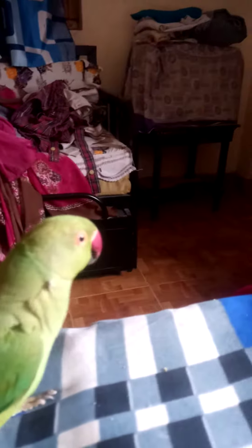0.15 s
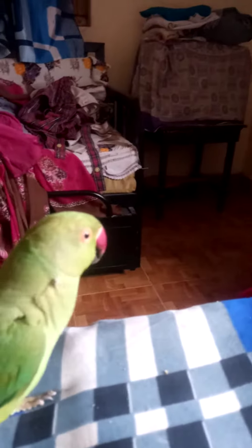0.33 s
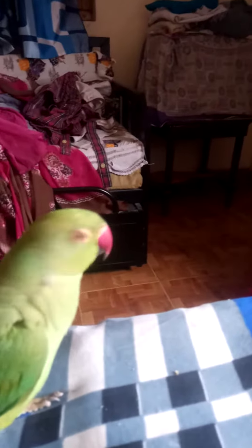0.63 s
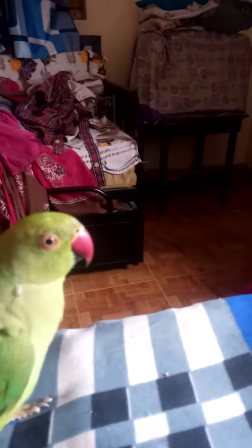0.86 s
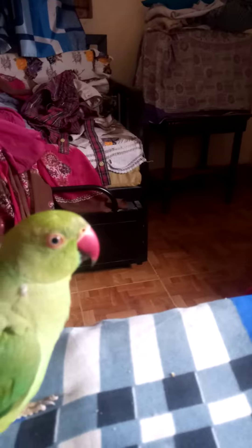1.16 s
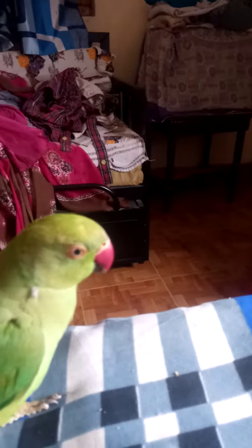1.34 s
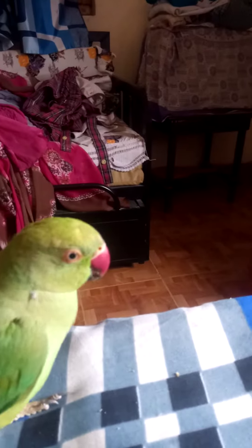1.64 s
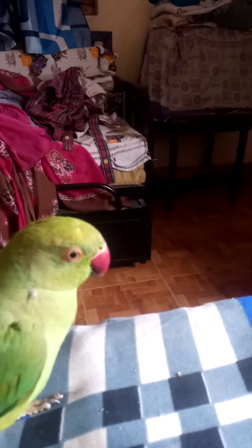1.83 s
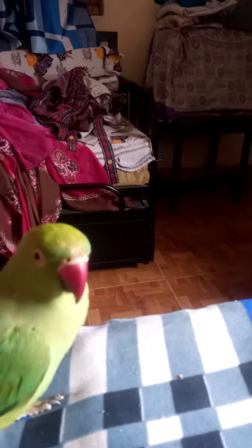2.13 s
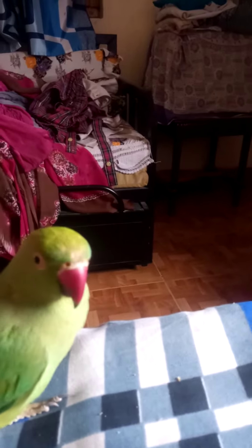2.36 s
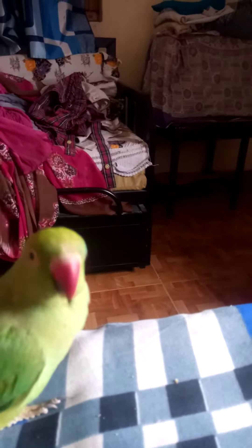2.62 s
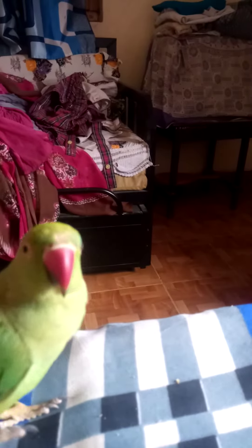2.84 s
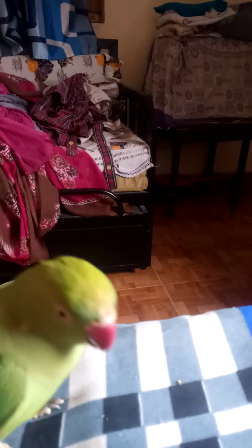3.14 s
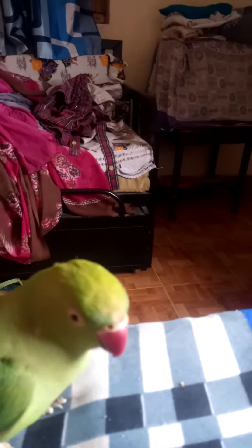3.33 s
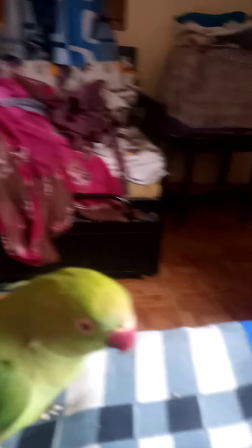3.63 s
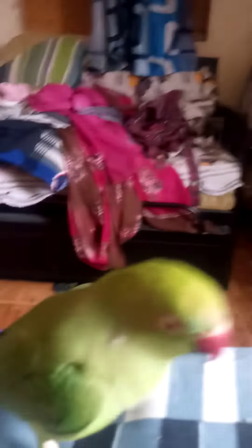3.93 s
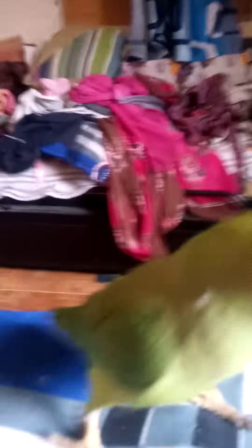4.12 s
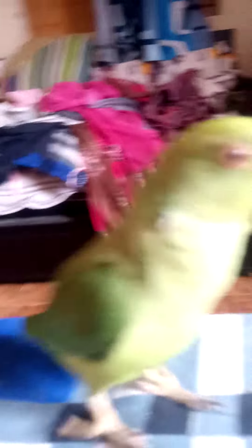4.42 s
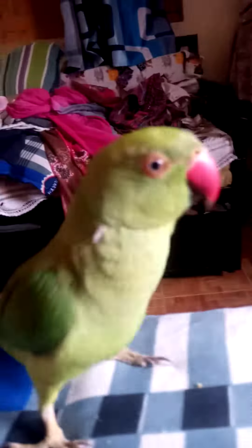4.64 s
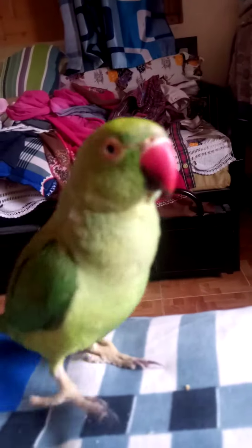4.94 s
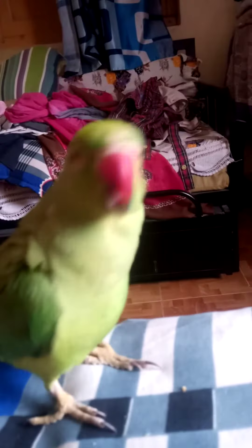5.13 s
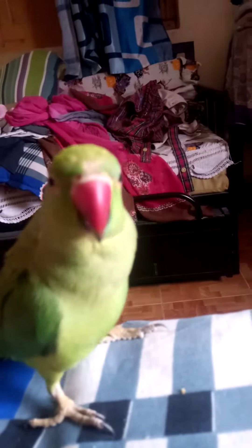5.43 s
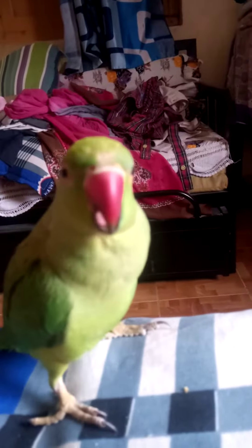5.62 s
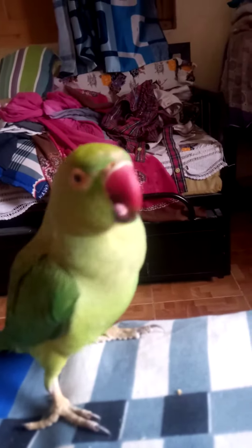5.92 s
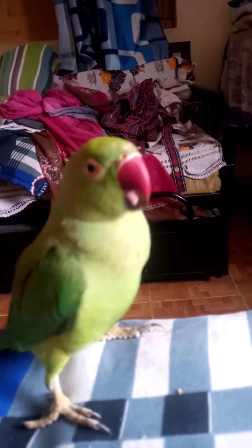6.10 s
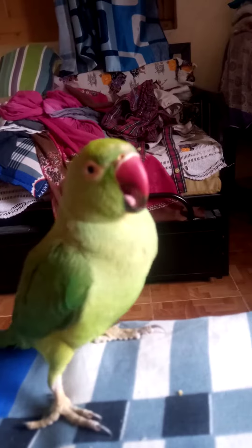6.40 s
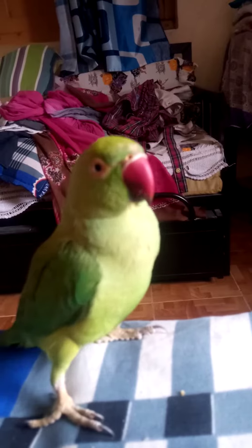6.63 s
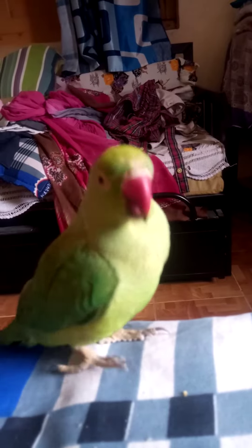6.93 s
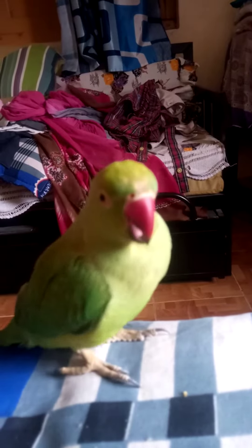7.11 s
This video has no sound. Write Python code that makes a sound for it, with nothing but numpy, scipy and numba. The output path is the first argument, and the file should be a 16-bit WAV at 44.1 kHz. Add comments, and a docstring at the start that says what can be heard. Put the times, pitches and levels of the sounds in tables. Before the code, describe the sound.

A faint fan hums in a small room while a parakeet, close to the phone's microphone, lets out eight brief, shrill screeches. Each starts as a rising buzz, becomes a whistle and drops away, leaving a short ring off the walls. The first three are separated by pauses; the last five come closer together. The hand holding the phone rumbles and bumps softly underneath.

```python
"""A faint fan hums in a small furnished room; close to a hand-held phone, a parakeet screeches eight times.
Each screech comes from a membrane in the syrinx, coloured by windpipe, throat and beak, and takes three
registers in quick succession: a rising buzz that cracks upward, a piercing whistle, and a drop of about
a fifth that slides away. The first screech has a short gap after its buzz. The room rings after each
and the phone's gain control ducks. Underneath, the hand on the phone rumbles and bumps softly."""
import sys
import numpy as np
from scipy import signal
from scipy.fft import rfft, irfft
from scipy.io import wavfile
from scipy.ndimage import map_coordinates
from numba import njit

SR = 44100
rng = np.random.default_rng(int(sys.argv[2]) if len(sys.argv) > 2 else 0)


def to_wav(s):
    """Save 16-bit WAV."""
    ch = np.atleast_2d(s).T  # columns
    pcm = np.round(np.clip(ch, -1, 1) * 32767)  # PCM
    wavfile.write(sys.argv[1], SR, pcm.astype(np.int16))


N = 320166
TIME = np.arange(N) / SR


def undb(db):
    """Decibels to gain."""
    return 10 ** (np.asarray(db) / 20)


def lookup(hz, points):
    """Read (frequency, value) points along a log axis."""
    f, value = np.transpose(points)
    return np.interp(np.log(np.maximum(hz, 1)), np.log(f), value)


def shaped(x, gain):
    """Filter by a gain that is a function of frequency."""
    return irfft(rfft(x) * gain(np.fft.rfftfreq(len(x), 1 / SR)), len(x))


def unit(x):
    """Scale to rms 1."""
    return x / np.sqrt(np.mean(x ** 2))


def wander(size, rate):
    """Smooth random drift with a spread near 1 and about `rate` turns a second."""
    at = np.arange(size) * rate / SR
    return map_coordinates(rng.standard_normal(int(at[-1]) + 2), [at], order=2, mode="nearest")


def resonance(hz, centre_hz, width_hz):
    """Complex response of one resonance, gain 1 at its centre."""
    return 1j * hz * width_hz / (centre_hz ** 2 - hz ** 2 + 1j * hz * width_hz)


def span(start, end):
    """Sample times of a note and its progress from 0 to 1."""
    t = TIME[int(start * SR):int(end * SR)]
    return t, np.linspace(0, 1, len(t))


def add(out, t, note, attack_s, release_s):
    """Mix a note in, with soft edges."""
    edges = np.clip((t - t[0]) / attack_s, 0, 1) * np.clip((t[-1] - t) / release_s, 0, 1)
    first = round(t[0] * SR)
    out[first:first + len(t)] += note * edges


def fan():
    """Room tone: a fan's rush of air and the slightly wavering hum of its motor."""
    # Room air and fan. Each row: frequency in Hz, noise density in dB per Hz.
    air_spectrum = [(25, -112), (55, -99), (90, -89.5), (130, -83.5), (210, -72), (330, -82), (550, -83),
                    (750, -91), (1200, -91), (3500, -95), (6500, -107), (9000, -127), (13000, -131),
                    (16000, -133)]
    # Motor tones. Each row: frequency in Hz, rms level in dB.
    motor_tones = [(406, -63), (507, -58.5), (913, -74.5)]
    air = shaped(rng.standard_normal(N), lambda f: undb(lookup(f, air_spectrum))) * np.sqrt(SR / 2)
    air *= undb(0.4 * wander(N, rate=4.6))
    hum = np.zeros(N)
    for hz, db in motor_tones:
        amplitude = np.sqrt(2) * undb(db + 0.41 * wander(N, rate=5.4))
        pitch = hz * (1 + 0.0013 * wander(N, rate=4.5))
        hum += amplitude * np.sin(2 * np.pi * np.cumsum(pitch) / SR)
    return air + hum


def hand(grip_db=-75.5, rise_s=0.026):
    """Handling noise: the grip on the phone rumbles faintly, and each shift swells into a soft bump."""
    # Shifts of the hand. Each row: start in seconds, level at the crest in dB.
    bumps = [(.3, -63), (.58, -60), (.86, -58.5), (1.42, -62), (1.97, -57), (2.35, -55.5), (2.49, -54),
             (2.73, -58.5), (3.53, -64), (4.96, -57)]
    strength = undb(grip_db)
    for start, db in bumps:
        age = np.maximum(TIME - start, 0) / rise_s
        strength = strength + undb(db) * age * np.exp(1 - age)
    rumble = shaped(rng.standard_normal(N), lambda f: resonance(f, centre_hz=78.5, width_hz=55) ** 2)
    return strength * unit(rumble)


def tract(hz, throat_hz, throat_db, beak_db, sheen_db, beak_hz=5500):
    """Gain of the windpipe, a tongue-tuned throat resonance, the open beak's treble and a thin top peak."""
    # Steady colour of windpipe and beak. Each row: frequency in Hz, gain in dB.
    windpipe = [(400, -4), (900, -2.5), (1400, -3), (2200, 3), (3500, 0), (5200, -3), (6600, 2.5),
                (8000, -6.5), (9600, -13.5), (11000, -22.5), (16000, -25)]
    treble = hz ** 4 / (hz ** 4 + beak_hz ** 4) * (hz / beak_hz) ** 0.26
    throat = throat_db * np.abs(resonance(hz, throat_hz, width_hz=1570)) ** 2
    sheen = sheen_db * np.abs(resonance(hz, centre_hz=15200, width_hz=2000)) ** 2
    return undb(lookup(hz, windpipe) + beak_db * treble + throat + sheen)


def syrinx(pitch, harmonics, colour, jitter, jitter_rate, shimmer_db, hiss_db, hiss_top_hz=11000):
    """A membrane vibrating a little unevenly, with a puff of air in each cycle, heard through the tract."""
    size = len(pitch)
    pitch = pitch * (1 + jitter * wander(size, jitter_rate))
    phase = 2 * np.pi * np.cumsum(pitch) / SR
    k = np.arange(1, int(SR / 2 / pitch.min()))[:, None]
    partials = undb(lookup(k, harmonics)) * colour(k * pitch) * (k * pitch < SR / 2)
    # the resonances hold each harmonic back differently, which smears the pulses
    tone = unit((partials * np.sin(k * phase + rng.standard_normal(k.shape))).sum(axis=0))
    puffs = rng.standard_normal(size) * (1 + np.cos(phase))
    hiss_band = lambda f: f ** 2 / (f ** 2 + pitch.mean() ** 2) / np.hypot(1, (f / hiss_top_hz) ** 2)
    hiss = unit(shaped(puffs, lambda f: colour(f) * hiss_band(f)))
    return tone * undb(shimmer_db * wander(size, rate=229)) + undb(hiss_db) * hiss


def buzzes(first_hz=470, swell_db=8, edge_hz=6400, edge_db=4):
    """Each screech opens with pulses that speed up, then turn rough as the pitch shoots upward."""
    # Each row: start, crack and end in seconds, pitch at the crack and at the end in Hz, level in dB,
    # throat resonance in Hz, its height in dB, beak brightness in dB.
    notes = [(0.168, 0.19, .203, 676, 1390, -26, 4580, 18, -1),
             (1.536, 1.562, 1.579, 884, 2664, -21.5, 4740, 18, -4),
             (3.171, 3.203, 3.217, 905, 2530, -14.5, 4570, 24.5, 0.5),
             (5.193, 5.216, 5.228, 1040, 2435, -15.5, 2510, 11, 1.5),
             (5.557, 5.58, 5.597, 1053, 2630, -15.5, 2690, 11, 5.5),
             (5.922, 5.955, 5.971, 1227, 2730, -16.5, 2960, 7, 3.5),
             (6.322, 6.345, 6.368, 1108, 2837, -18, 3000, 6, 2.5),
             (7.011, 7.049, 7.065, 1071, 2730, -19, 4200, 8, 4)]
    # The buzz at the syrinx. Each row: harmonic number, strength in dB.
    harmonics = [(1, 4.5), (2, 2.5), (4, -3.5), (8, -9), (16, -9.5), (32, -14)]
    out = np.zeros(N)
    upper_throat = lambda f: undb(edge_db * np.abs(resonance(f, edge_hz, width_hz=1100)) ** 2)
    for start, crack, end, crack_hz, end_hz, db, throat_hz, throat_db, beak_db in notes:
        t, _ = span(start, end)
        rise = np.clip((t - start) / (crack - start), 0, 1)
        leap = np.clip((t - crack) / (end - crack), 0, 1)
        pitch = first_hz + (crack_hz - first_hz) * rise ** 0.8 + (end_hz - crack_hz) * leap ** 0.99
        rough = np.sin(np.pi * leap ** 0.6)
        colour = lambda f: upper_throat(f) * tract(f, throat_hz, throat_db, beak_db, sheen_db=-4)
        note = syrinx(pitch, harmonics, colour, jitter=0.016 + 0.076 * rough, jitter_rate=900,
                      shimmer_db=2.2, hiss_db=-21 + 10 * rough)
        add(out, t, note * undb(db - swell_db * (1 - rise) ** 2), attack_s=0.0049, release_s=0.0056)
    return out


def whistles(scoop_share=0.03, scoop_s=0.0048, sag_s=0.00522, edge_hz=6900, edge_db=4):
    """An almost pure tone scoops up, holds and sags; its octave rings the upper throat resonance."""
    # Each row: start and end in seconds, held pitch and sag in Hz, moment of the sag as a share of
    # the note, first and last level in dB, beak brightness in dB, sheen near 15 kHz in dB.
    notes = [(0.243, 0.291, 3127, 340, .45, -23, -19, 5, 4),
             (1.578, 1.613, 3423, 760, 0.82, -15.5, -21, -13, -5),
             (3.218, 3.272, 3613, 550, 0.52, -4.5, -18.5, -13, -5),
             (5.229, 5.287, 3353, 432, 0.53, -11.5, -10, -4, -7),
             (5.594, 5.657, 3424, 401, .48, -16.5, -10, 3, -16),
             (5.974, 6.012, 3730, 298, .52, -19.5, -15.5, -3, 20),
             (6.368, 6.407, 3733, 257, 0.99, -16, -13, -7, 17),
             (7.069, 7.129, 3786, 696, 0.93, -10, -9.5, -8, 26.5)]
    # The whistle at the syrinx. Each row: harmonic number, strength in dB.
    harmonics = [(1, -2.5), (2, -13.5), (3, -21), (4, -22.5), (6, -41.5)]
    out = np.zeros(N)
    for start, end, held_hz, sag_hz, sag_at, first_db, last_db, beak_db, sheen_db in notes:
        t, progress = span(start, end)
        scoop = scoop_share * np.exp(-(t - start) / scoop_s)
        sag = 1 / (1 + np.exp((sag_at - progress) * (end - start) / sag_s))
        pitch = held_hz * (1 - scoop) - sag_hz * sag
        colour = lambda f: tract(f, edge_hz, edge_db, beak_db, sheen_db)
        note = syrinx(pitch, harmonics, colour, jitter=0.006, jitter_rate=600, shimmer_db=2, hiss_db=-21)
        level = undb(first_db + (last_db - first_db) * progress)
        add(out, t, note * level, attack_s=0.003, release_s=0.0014)
    return out


def falls(wobble_hz=40.4, settle_s=0.032, lift_hz=29.84, crest_share=0.45, last_hz=1375, closing_db=9):
    """The voice breaks to a lower, reedier register and slides down, sweeping the throat resonance."""
    # Each row: start and end in seconds, held pitch and overshoot at the break in Hz, length of the
    # slide in seconds, first and last level in dB, throat resonance in Hz, its height in dB,
    # beak brightness in dB, sheen near 15 kHz in dB.
    notes = [(0.286, 0.352, 2020, 50, .058, -19, -26, 3420, 6.5, -2, 3),
             (1.613, 1.687, 2323, -160, 0.03, -19.5, -20.5, 4750, 10, -9, 3),
             (3.267, 3.329, 2210, 50, 0.03, -14, -15.5, 4400, 19, -5, 27),
             (5.288, 5.344, 2298, 121, 0.028, -15.5, -16, 2680, 3.5, 1, 0),
             (5.655, 5.711, 2282, -110, 0.025, -14.5, -14.5, 2660, 4.5, 2.5, 0),
             (6.008, 6.079, 2459, 23, .036, -17.5, -18, 4210, 11, 5, 8),
             (6.403, 6.482, 2491, -48.5, .041, -13.5, -19, 4400, 13.5, 6.5, 3),
             (7.134, 7.195, 2510, 130, .036, -17, -23, 4340, 7.7, 3.5, 8)]
    # The reedy register at the syrinx. Each row: harmonic number, strength in dB.
    harmonics = [(1, -1.5), (2, -3.5), (3, -4.5), (4, -6), (6, -20), (11, -28)]
    out = np.zeros(N)
    for (start, end, held_hz, overshoot_hz, slide_s, first_db, last_db,
         throat_hz, throat_db, beak_db, sheen_db) in notes:
        t, progress = span(start, end)
        age = t - start
        wobble = overshoot_hz * np.exp(-age / settle_s) * np.cos(2 * np.pi * wobble_hz * age)
        slide = np.clip(1 - (end - t) / slide_s, 0, 1) ** 1.75
        # effort lifts the pitch from just under the held note to just over it
        lift = -lift_hz * np.cos(np.pi * np.minimum(progress / crest_share, 1))
        pitch = (held_hz + wobble + lift) * (1 - slide) + last_hz * slide
        # unsteady just after the break, and again as the note dies
        unsteady = 1 + np.exp(-10 * progress) + 2 * progress ** 4
        colour = lambda f: tract(f, throat_hz, throat_db, beak_db, sheen_db)
        note = syrinx(pitch, harmonics, colour, jitter=0.013 * unsteady, jitter_rate=1100,
                      shimmer_db=2.6, hiss_db=-14.5)
        # the closing beak forms one more resonance, which gives the last moment its bite
        bite = shaped(note, lambda f: resonance(f, centre_hz=3600, width_hz=680))
        note = note + undb(closing_db) * progress ** 4 * bite
        level = undb(first_db + (last_db - first_db) * progress)
        add(out, t, note * level, attack_s=0.0039, release_s=0.0088)
    return out


def room(voice, tail_db=-10, gap_s=0.011, scatter_s=0.00074):
    """The small room: bounces scattered by furniture, then a diffuse tail that lasts longest mid-band."""
    # Decay of the room. Each row: frequency in Hz, seconds to fall by 60 dB.
    decay_times = [(500, 0.2), (2300, 0.35), (4500, 0.31), (8000, 0.29), (15000, 0.12)]
    # First bounces off floor, walls and ceiling. Each row: delay in seconds, relative level in dB.
    bounces = [(.0052, -9), (.0127, -12.5), (.0158, -6), (.0196, -25.5), (.0221, -14.5), (.027, -23.5)]
    # The further the head turns from the microphone, the more of the voice goes into the room.
    # Each row: time in seconds, gain into the room in dB.
    head_turns = [(.3, 1), (1.65, -1.5), (3.25, -8.5), (5.3, -5), (5.65, -5.5), (6.05, -2.5), (6.45, -1.5),
                  (7.1, -4.5)]
    t = TIME[:SR * 3 // 4]
    centres = np.geomspace(250, 16000, 7)
    noise = rng.standard_normal(len(t))
    tail = np.zeros(len(t))
    for hz in centres:
        octave = shaped(noise, lambda f: lookup(f, np.c_[centres, centres == hz]))
        tail += octave * 1000 ** (-t / lookup(hz, decay_times))
    response = undb(tail_db) * unit(tail * np.clip(t / gap_s - 1, 0, 1))
    for delay_s, db in bounces:
        scatter = (t > delay_s) * np.exp(-np.abs(t - delay_s) / scatter_s)
        response += undb(db) * unit(rng.standard_normal(len(t)) * scatter)
    # Colour of what the walls return. Each row: frequency in Hz, gain in dB.
    walls = [(700, -7.5), (1500, -9), (2200, -1), (3700, 6.5), (5000, 2.5), (7000, 2), (15000, 7)]
    response = shaped(response / np.sqrt(len(t)), lambda f: undb(lookup(f, walls)))
    into_room = undb(np.interp(TIME, *np.transpose(head_turns)))
    return signal.fftconvolve(voice * into_room, response)[:N]


def scene():
    """At the microphone, in mono: the bird close by, its room, the fan and the hand."""
    bird = buzzes() + whistles() + falls()
    return (bird + room(bird) + fan() + hand())[None]


@njit
def follow(x, attack, release):
    """Envelope that rises and falls at different speeds."""
    out, level = np.empty(len(x)), 0.
    for i in range(len(x)):
        level += (x[i] - level) * (attack if x[i] > level else release)
        out[i] = level
    return out


def record(dry, knee_db=-22, squeeze=0.42, attack_s=0.0022, release_s=0.021, top_hz=15900):
    """The phone: its microphone port rings, gain control ducks each screech, the top cuts off steeply."""
    mic = shaped(dry[0], lambda f: 1 + undb(6.5) * resonance(f, centre_hz=15100, width_hz=870))
    envelope = follow(np.abs(mic), 1 / (attack_s * SR), 1 / (release_s * SR))
    look_ahead = np.interp(TIME + attack_s, TIME, envelope)
    ducked = mic * np.maximum(look_ahead / undb(knee_db), 1) ** -squeeze
    lowpass = signal.ellip(10, 0.2, 70, top_hz, fs=SR, output="sos")
    return signal.sosfilt(lowpass, ducked)[None]


dry = scene()
out = record(dry)
to_wav(out)
```